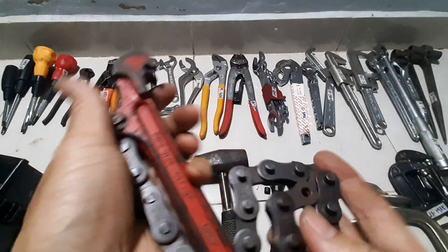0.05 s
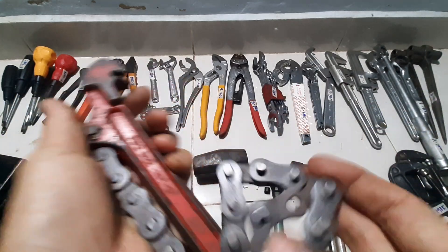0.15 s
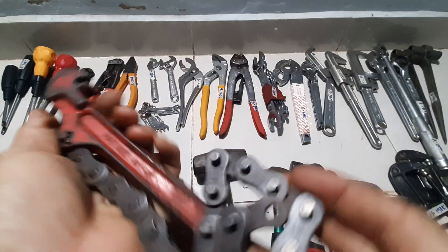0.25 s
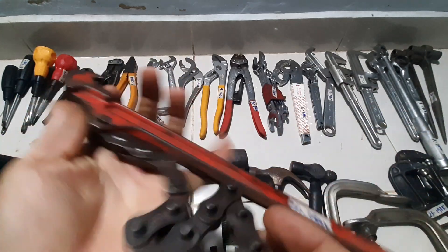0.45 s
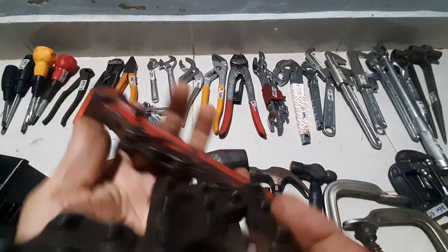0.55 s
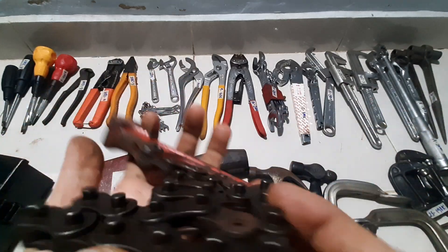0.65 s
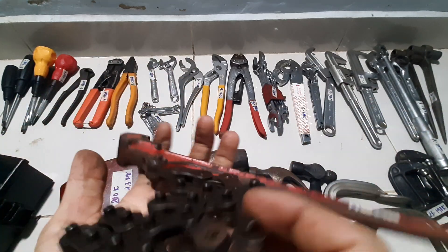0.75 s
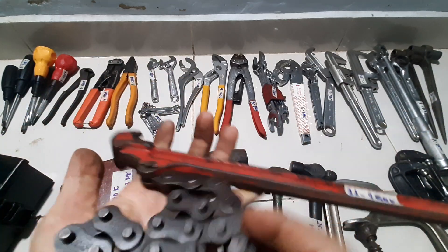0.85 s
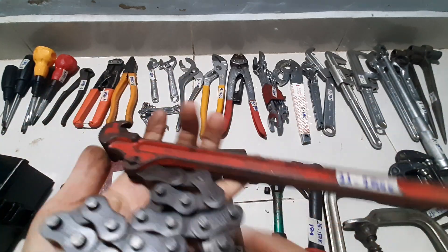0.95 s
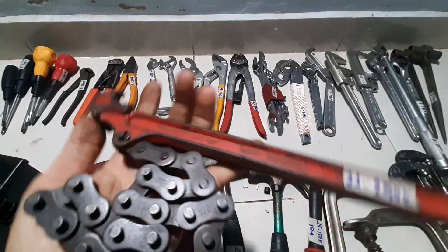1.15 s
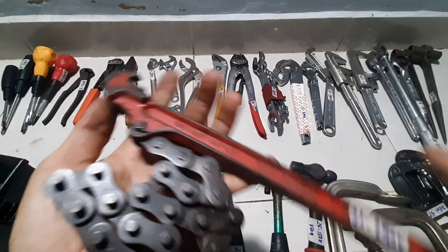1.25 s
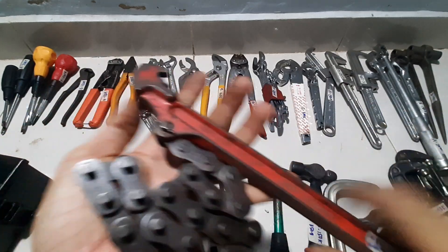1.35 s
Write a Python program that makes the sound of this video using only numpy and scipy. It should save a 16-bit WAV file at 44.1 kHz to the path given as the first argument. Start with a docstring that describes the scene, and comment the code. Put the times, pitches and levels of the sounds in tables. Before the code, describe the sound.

A steel chain wrench turns in the hands, close and slightly left, in a quiet small room. Soft skin rub and light link ticks lead to quick clacks around 0.2 s. Bright, hard chain-on-handle knocks cluster at 0.3-0.4 s, with a dull palm thump at 0.34. Another sharp clack lands at 0.5, faint ticks near 0.6, weaker knocks at 0.77 and 0.9, then low rumble and a barely audible thin squeak after 1.1.

```python
"""A steel chain wrench is turned over in the hands, close by and a little to the left, in a quiet workshop.
From the start: filtered noise for low room rumble, moving hands, and skin rubbing on steel.
Links shuffle as random contacts and pins tick; then the chain clacks on the handle, noise bursts with damped modes.
One drop thumps into the palm, a decaying low cosine and a slap; sliding steel sings in narrow noise bands.
Late on, a thin squeak glides as two noise bands. The chain's sound is reflected by the room."""
import sys
import numpy as np
from scipy import signal
from scipy.fft import rfft, irfft, next_fast_len
from scipy.io import wavfile

SR = 44100
rng = np.random.default_rng(int(sys.argv[2]) if len(sys.argv) > 2 else 0)


def int16_out(signal):
    """Quantize to a 16-bit WAV file."""
    q = np.round(np.clip(np.atleast_2d(signal).T, -1, 1) * 32767)
    wavfile.write(sys.argv[1], SR, q.astype(np.int16))


N = 61739
TIME = np.arange(N) / SR

# Room background spectrum, relative: (frequency [Hz], density [dB per Hz])
FLOOR_SPECTRUM = [(20, -31.5), (42, -8), (68, 4), (130, -5.5), (250, -18.5), (500, -34.5), (1000, -41),
                  (1700, -34.5), (2700, -43), (4200, -34), (8500, -50.5), (12500, -38), (16000, -41.5)]
FLOOR_DB = -56
NOISE_LIKENESS, NOISE_PAN_DB = 0.8, 2.5  # likeness of the sides, 0 to 1; left over right

# Dull rumble of the moving hands: (time [s], level [dB])
HANDS_LEVEL = [(0, -56), (.15, -72.5), (.24, -56.5), (.45, -60), (.58, -70), (.77, -70), (1.12, -80.5),
               (1.24, -58), (1.4, -65.5)]
# Its relative spectrum: (frequency [Hz], level [dB])
HANDS_SPECTRUM = [(30, -14.5), (130, 0.5), (250, -8.5), (500, -20), (1000, -39.5), (4000, -60)]

# Skin sliding on the handle: (time [s], centre frequency [Hz], level [dB])
RUB_PATH = [(0, 3600, -51.5), (.045, 3600, -52.5), (.1, 2947, -53), (.135, 3000, -59.5)]
RUB_WIDTH_HZ, RUB_PAN_DB = 750, 1
RUB_RELEASE_S = 0.14  # time to fall a further 60 dB after the last row

# Links shifting against each other: (time [s], level [dB])
SHIFT_LEVEL = [(0, -59.5), (.19, -51.5), (.225, -53), (.26, -37), (.285, -71), (.33, -46), (.375, -26.5),
               (.41, -32.5), (.48, -38), (.55, -47.5), (.62, -64), (.83, -56.5), (.93, -53.5), (1.0, -80.5),
               (1.15, -79.5), (1.24, -60.5), (1.4, -69.5)]
SHIFTS_PER_S, SHIFT_T60_S = 3000, 0.011

# Pins ticking in their links: (time [s], level [dB], treble gain [dB])
PIN_TICKS = [(0.0381, -28, 9), (0.1318, -37.5, 0.5), (.1828, -19, 2), (0.182, -27, -4),
             (0.2135, -14.5, 2.5), (0.4905, -19.5, -8), (0.564, -26, -2), (.5856, -29, 3.5),
             (.8795, -36.5, -7)]
# Spectral colour of the ticks: (frequency [Hz], gain [dB])
TICK_SPECTRUM = [(300, -26), (2000, -15.5), (4000, -7), (7000, -4), (8800, -9.5), (11500, -2), (16000, -3)]
TICK_T60_S, TICK_PAN_DB = 0.004, 7

# Chain meeting handle: (time [s], clack level [dB], clack t60 [s], clack treble gain [dB],
# handle ring level [dB], ring tilt [dB/octave], favoured ring frequency [Hz],
# handle ring length factor [1], link ring level [dB], left over right [dB])
CHAIN_KNOCKS = [ (0.1408, -17.5, 0.015, -15, -19, -4, 3000, 0.64, -50, 22.5),
                (0.1993, -19, 0.075, -6, -24.5, -6, 3000, 1, -59, 11),
                (0.2075, -10, 0.034, -8, -31.5, -4, 3000, 0.49, -27, 3.5),
                (0.2132, -12, .012, -3.5, -25, -2, 3000, 1.6, -31, 12.5),
                (0.2958, 1, .022, -10, -1, 0, 4695, 0.59, -28, 6.5),
                (0.3169, -16.5, .03, -6, -15, -4, 3000, 0.8, -29, 13.5),
                (.3368, -4.5, 0.028, 7.5, -0.5, 0, 7200, 1, -11.5, 6.5),
                (0.3415, -18.5, .02, 4.5, -3.5, 3, 7200, 0.82, -16, -1.5),
                (0.3927, -1, 0.035, -2.5, 3.5, 1, 1130, 0.96, -30, 3.5),
                (0.4979, -15, 0.051, -3.5, -25, -3, 3000, 0.74, -24, 15.5),
                (0.5032, 4.5, .016, 0, -17, -1.5, 1100, 0.37, 4, 10.5),
                (0.7697, -29.5, .025, -5, -29.5, -4, 1550, 0.23, -51, 4),
                (0.9021, -17, 0.018, -27, -27.5, -1, 3216, 1.47, -51, 4),
                (1.186, -50, .05, 1, -44.5, -2.5, 4850, 2.63, -46.5, 4.5), ]
# Handle modes: (frequency [Hz], level [dB], t60 before the length factor [s], left over right [dB])
HANDLE_MODES = [(545, -47, .3, 12), (1132, -39, .11, 8), (1510, -33, .13, -3), (2990, -29, .15, 1),
                (3065, -22, .07, 4), (4753, -27, .04, 2), (4846, -19, .055, 0), (5437, -30, .12, -3),
                (5823, -28, .085, 3), (7197, -19, .06, 0), (7290, -31, .04, 1), (9937, -30, .12, -2)]
# Link modes: (frequency [Hz], level [dB], t60 before the length factor [s], left over right [dB])
LINK_MODES = [(4850, -25, .045, -3), (9326, -20, .035, 10), (12500, -32, .1, 2), (13080, -25, .03, 8)]
# Spectral colour of steel on steel: (frequency [Hz], gain [dB])
CLACK_SPECTRUM = [(200, -22.5), (700, -22.5), (1100, -18.5), (1700, -15.5), (2500, -7), (3100, 1.5),
                  (4500, -2), (6000, -3.5), (7600, -8.5), (8600, -13.5), (10000, -13), (11300, -12.5),
                  (13000, -9.5), (16000, -21.5)]
CRACK_DB, SCATTER_DB, TREBLE_HZ = 8, 12.5, 8000  # first contact; chatter after it; corner of the treble
FAVOUR_DB, FAVOUR_OCTAVES = 8.5, 0.3  # boost of modes near the favoured pitch, and its reach
RING_SPREAD_DB, RING_PAN_SHARE, LINK_LENGTH = 2.5, 0.3, 0.86
RIGHT_LAG_S = 0.00024

BENCH_DB, BENCH_T60_S, BENCH_ONSET_S = -17.5, 0.13, 0.004  # early reflections from bench and wall
ROOM_DB, ROOM_T60_S, ROOM_ONSET_S = -18.5, 0.29, 0.005  # diffuse tail

THUMP_S, THUMP_DB, THUMP_HZ, THUMP_T60_S, THUMP_PAN_DB = 0.3368, -18, 66, 0.06, 24
SLAP_DB, SLAP_LOW_HZ, SLAP_HIGH_HZ = 22, 45, 176  # impulse gain; corners of its band

# Steel singing as it slides through the grip: (time [s], level [dB])
SLIDE_LEVEL = [(0, -104), (.45, -67.5), (.6, -72), (.8, -82.5), (.94, -69.5), (1.05, -87.5), (1.17, -82),
               (1.25, -76), (1.31, -80), (1.37, -71.5)]
# Its resonances: (frequency [Hz], relative level [dB])
SLIDE_RESONANCES = [(860, -9.5), (1360, -5.5), (1520, 0), (1735, 1.5), (2040, 0.5), (2220, -6)]
SLIDE_WIDTH_HZ = 83

# A thin gliding squeak: (time [s], frequency [Hz], level [dB])
SQUEAK_PATH = [(1.05, 10850, -100), (1.08, 10850, -78), (1.13, 11100, -78), (1.18, 12400, -76),
               (1.245, 13100, -74), (1.3, 11900, -77), (1.37, 9800, -92)]
SQUEAK_WIDTH_HZ, SQUEAK_UPPER_RATIO = 100, 1.1

CUTOFF_HZ = 16000


def from_db(db):
    """Logarithmic level: decibels become an amplitude ratio."""
    return 10 ** (np.asarray(db) / 20)


def unit(x):
    """Mean power: scale to rms 1."""
    return x / np.sqrt(np.mean(x ** 2) + 1e-20)


def pan(db):
    """Interaural level difference: the right side is lowered by db."""
    return from_db(np.array([[0], [-db]]))


def in_time(rows):
    """Linear interpolation: each column of a curve at every sample."""
    s, *columns = np.transpose(rows)
    return [np.interp(TIME, s, column) for column in columns]


def dying(s, t60):
    """Exponential decay and interaural delay: 60 dB down in t60, the right side starting slightly later."""
    age = TIME - s - np.array([[0], [RIGHT_LAG_S]])
    return (age >= 0) * from_db(-60 * np.maximum(age, 0) / t60)


def colour(x, points):
    """Minimum-phase filtering: a folded cepstrum makes the given spectrum causal."""
    size = next_fast_len(2 * N)
    hz, db = np.transpose(points)
    bins = np.maximum(np.fft.rfftfreq(size, 1 / SR), 1)
    gain = from_db(np.interp(np.log(bins), np.log(hz), db))
    cepstrum = irfft(np.log(gain), size)
    cepstrum[1:size // 2] *= 2
    cepstrum[size // 2 + 1:] = 0
    response = np.exp(rfft(cepstrum))
    return irfft(rfft(x, size) * response, size)[..., :N]


def low_pass(x, hz, order=2):
    """Butterworth response: maximally flat below the corner."""
    sections = signal.butter(order, hz, fs=SR, output="sos")
    return signal.sosfilt(sections, x + 1e-18)


def coloured_noise(points):
    """Partial coherence: noise of a given spectrum, mostly alike on both sides."""
    mid, side = rng.standard_normal((2, N))
    opposed = side * np.array([[1], [-1]])
    noise = np.sqrt(1 + NOISE_LIKENESS) * mid + np.sqrt(1 - NOISE_LIKENESS) * opposed
    return pan(NOISE_PAN_DB) * unit(colour(noise, points))


def gliding_noise(hz, width_hz):
    """Frequency translation: slow complex noise rides on a moving carrier, at rms 1."""
    real, imaginary = low_pass(rng.standard_normal((2, 2, N)), width_hz / 2, order=3)
    carrier = np.exp(2j * np.pi * np.cumsum(hz) / SR)
    return unit(np.real((real + 1j * imaginary) * carrier))


def background():
    """Stationary random noise: the room's low rumble and faint hiss."""
    return from_db(FLOOR_DB) * coloured_noise(FLOOR_SPECTRUM)


def hands_rumble():
    """Amplitude-modulated noise: a dull rumble swells and sinks as the hands move."""
    level_db, = in_time(HANDS_LEVEL)
    return from_db(level_db) * coloured_noise(HANDS_SPECTRUM)


def skin_rub():
    """Sliding friction: skin on steel gives a soft band of noise that moves in pitch."""
    hz, level_db = in_time(RUB_PATH)
    after_s = np.maximum(TIME - RUB_PATH[-1][0], 0)
    level_db = level_db - 60 * after_s / RUB_RELEASE_S
    return from_db(level_db) * pan(RUB_PAN_DB) * gliding_noise(hz, RUB_WIDTH_HZ)


def contact(s, t60, treble_db):
    """Impact: one sharp crack, then a quickly dying chatter, with more or less treble."""
    envelope = dying(s, t60)
    chatter = unit(envelope * rng.standard_normal((2, N))) / np.sqrt(N)  # energy, not power, is set
    x = from_db(SCATTER_DB) * chatter
    x[[0, 1], np.argmax(envelope, axis=1)] += from_db(CRACK_DB)
    dull = low_pass(x, TREBLE_HZ, order=1)
    return dull + from_db(treble_db) * (x - dull)


def link_shuffle():
    """Superposition of random impacts: many small contacts as the links shift."""
    level_db, = in_time(SHIFT_LEVEL)
    occurs = rng.random(N) < SHIFTS_PER_S / SR
    grains = occurs * rng.uniform(-1.1, 1, N) * from_db(level_db)
    one_contact = contact(0, SHIFT_T60_S, 0)
    shuffle = signal.fftconvolve(grains[None], one_contact, axes=1)[:, :N]
    return colour(shuffle, CLACK_SPECTRUM)


def pin_ticks():
    """Brief impact: each pin ticking in its link is a crack with a very short burst of noise."""
    ticks = 0
    for s, level_db, treble_db in PIN_TICKS:
        ticks = ticks + from_db(level_db) * contact(s, TICK_T60_S, treble_db)
    return colour(pan(TICK_PAN_DB) * ticks, TICK_SPECTRUM)


def ring(modes, s, weight_db, length):
    """Modal vibration: damped sines vary in strength per blow, a quarter cycle apart between sides."""
    out = 0
    for (hz, db, t60, pan_db), extra_db in zip(modes, weight_db):
        level_db = db + extra_db + RING_SPREAD_DB * rng.standard_normal()
        phase = 2 * np.pi * (hz * TIME + rng.random()) - np.array([[0], [np.pi / 2]])
        out = out + from_db(level_db) * pan(pan_db) * dying(s, t60 * length) * np.sin(phase)
    return out


def chain_knocks():
    """Impact excitation of modes: chain on handle clacks and sets handle and links ringing."""
    clacks, rings = 0, 0
    hz = np.array(HANDLE_MODES)[:, 0]
    for (s, clack_db, t60, treble_db, handle_db, tilt_db, favoured_hz,
         length, link_db, pan_db) in CHAIN_KNOCKS:
        clacks = clacks + from_db(clack_db) * pan(pan_db) * contact(s, t60, treble_db)
        tilt = tilt_db * np.log2(hz / np.median(hz))
        # the point of contact favours the modes near one pitch
        distance = np.log2(hz / favoured_hz) / FAVOUR_OCTAVES
        favour = FAVOUR_DB * np.exp(-distance ** 2)
        handle = ring(HANDLE_MODES, s, handle_db + tilt + favour, length)
        links = ring(LINK_MODES, s, np.full(len(LINK_MODES), link_db), LINK_LENGTH)
        rings = rings + pan(RING_PAN_SHARE * pan_db) * (handle + links)
    return colour(clacks, CLACK_SPECTRUM) + rings


def room(x):
    """Reverberation: the left signal meets early reflections and a diffuse tail, different on each side."""
    early, late = rng.standard_normal((2, 2, N))
    bench = from_db(BENCH_DB) * unit(early * dying(BENCH_ONSET_S, BENCH_T60_S))
    tail = from_db(ROOM_DB) * unit(late * dying(ROOM_ONSET_S, ROOM_T60_S))
    response = (bench + tail) / np.sqrt(N)
    return signal.fftconvolve(x[:1], response, axes=1)[:, :N]


def palm_thump():
    """Damped oscillation: the chain's weight lands in the hand with a dull slap and a low swing."""
    oscillation = np.cos(2 * np.pi * THUMP_HZ * (TIME - THUMP_S))
    swing = from_db(THUMP_DB) * dying(THUMP_S, THUMP_T60_S) * oscillation
    push = from_db(SLAP_DB) * signal.unit_impulse(N, int(THUMP_S * SR))
    slap = low_pass(push, SLAP_HIGH_HZ, order=1) - low_pass(push, SLAP_LOW_HZ, order=1)
    return pan(THUMP_PAN_DB) * low_pass(swing + slap, hz=900)


def sliding_steel():
    """Resonance: steel sings faintly in narrow noise bands as it slides through the grip."""
    level_db, = in_time(SLIDE_LEVEL)
    tones = 0
    for hz, db in SLIDE_RESONANCES:
        tones = tones + from_db(db) * gliding_noise(np.full(N, hz), SLIDE_WIDTH_HZ)
    return from_db(level_db) * tones


def squeak():
    """Narrow-band noise: two bands glide in a fixed frequency ratio as a faint squeak."""
    hz, level_db = in_time(SQUEAK_PATH)
    lower = gliding_noise(hz, SQUEAK_WIDTH_HZ)
    upper = gliding_noise(hz * SQUEAK_UPPER_RATIO, SQUEAK_WIDTH_HZ)
    return from_db(level_db) * (lower + upper)


def scene():
    """Superposition: chain, room and hands sound together."""
    chain = chain_knocks() + pin_ticks() + link_shuffle()
    reflected = room(chain)
    hands = palm_thump() + squeak() + skin_rub() + sliding_steel() + hands_rumble()
    return chain + reflected + hands + background()


def record(dry):
    """Clipping and band limitation: peaks are cut at full scale, then a steep low-pass removes the top."""
    sections = signal.ellip(10, 0.1, 80, CUTOFF_HZ, fs=SR, output="sos")
    return signal.sosfilt(sections, np.clip(dry, -1, 1))


dry = scene()
out = record(dry)
int16_out(out)
```